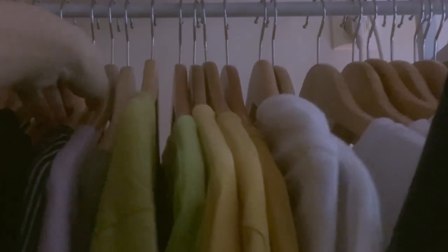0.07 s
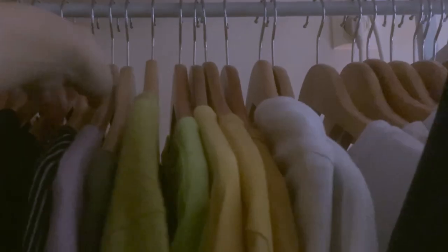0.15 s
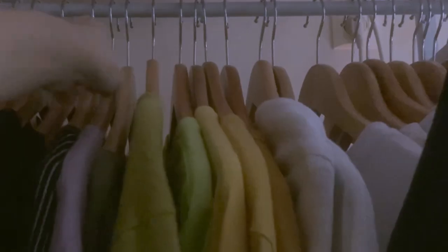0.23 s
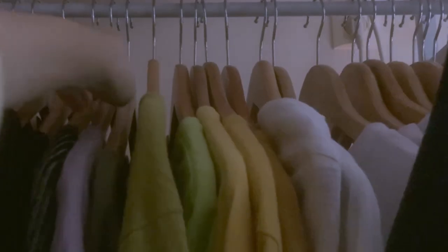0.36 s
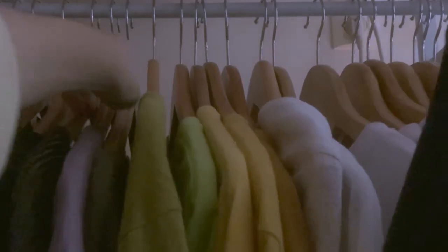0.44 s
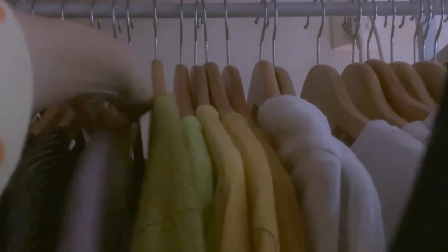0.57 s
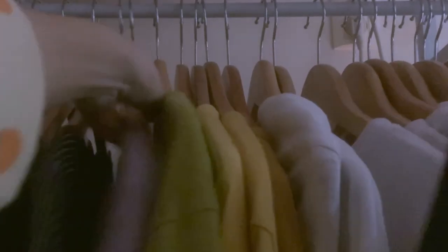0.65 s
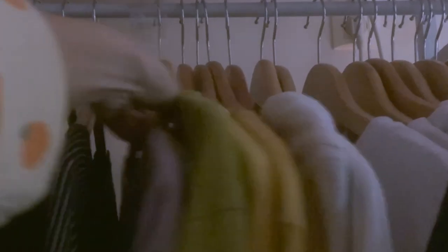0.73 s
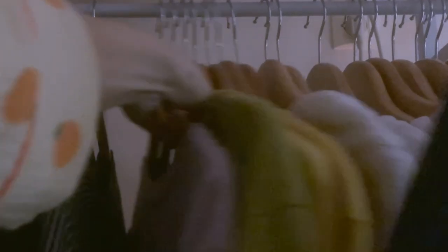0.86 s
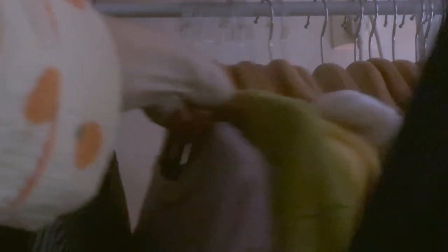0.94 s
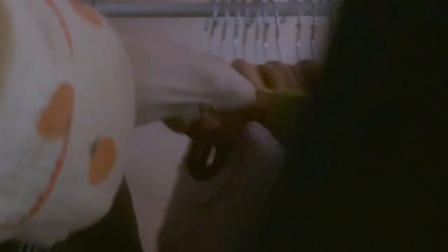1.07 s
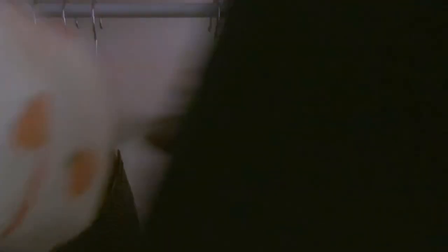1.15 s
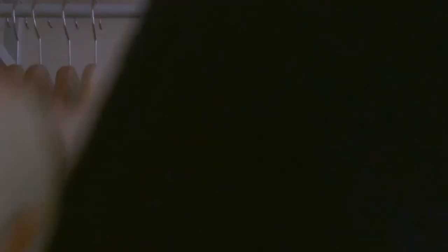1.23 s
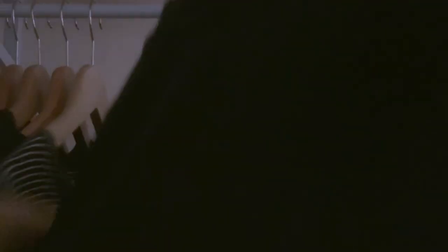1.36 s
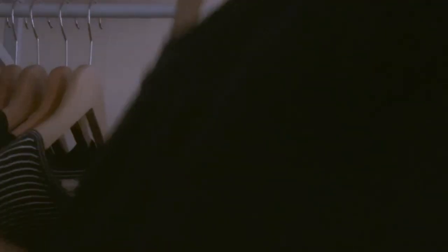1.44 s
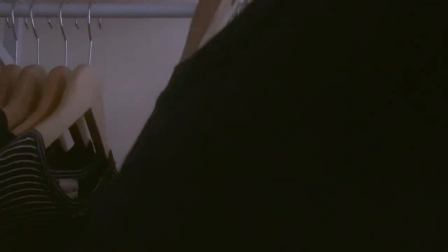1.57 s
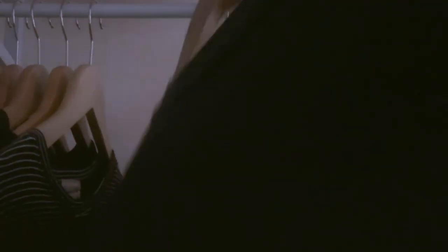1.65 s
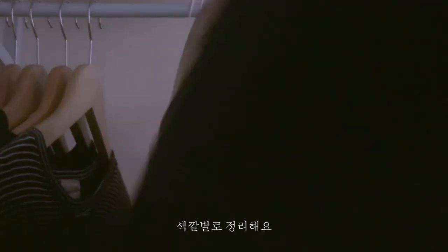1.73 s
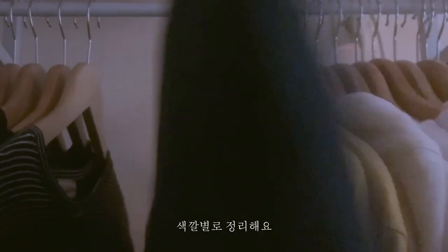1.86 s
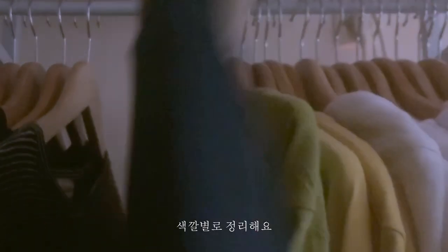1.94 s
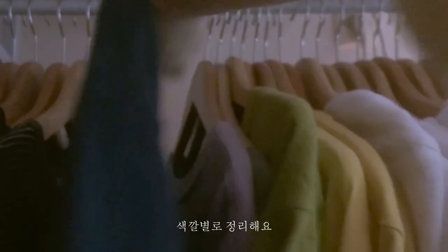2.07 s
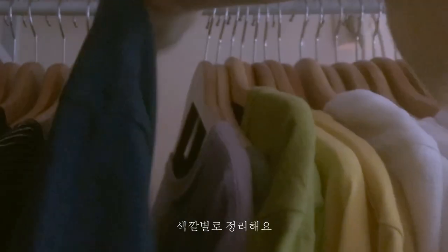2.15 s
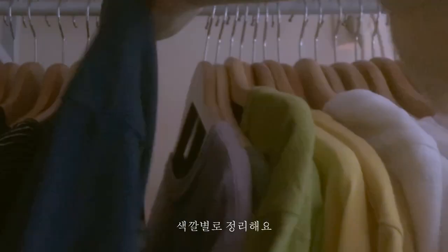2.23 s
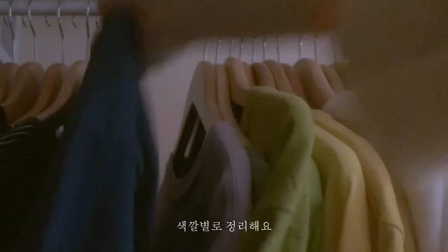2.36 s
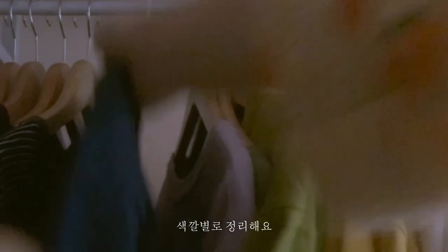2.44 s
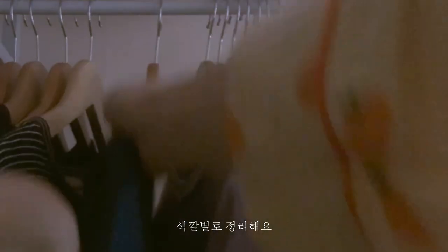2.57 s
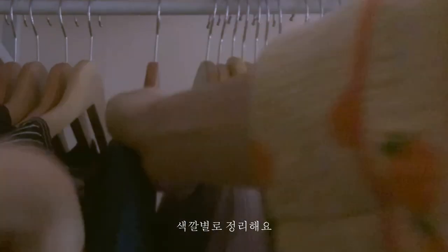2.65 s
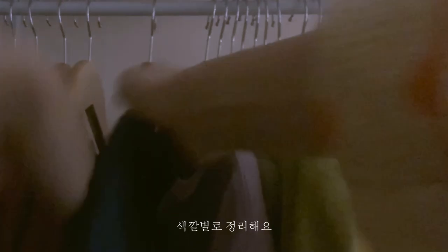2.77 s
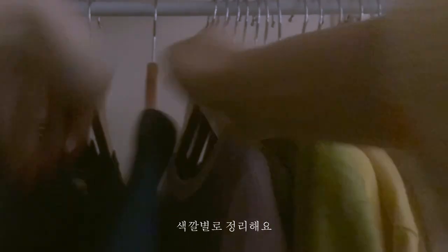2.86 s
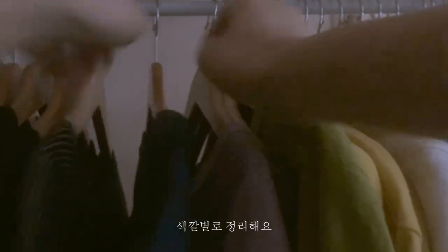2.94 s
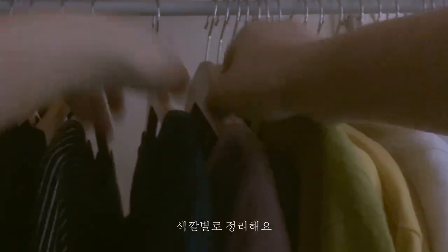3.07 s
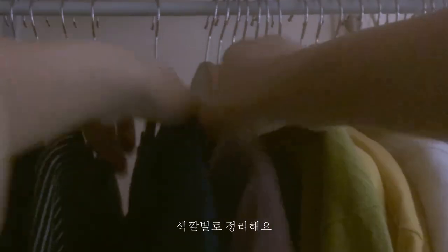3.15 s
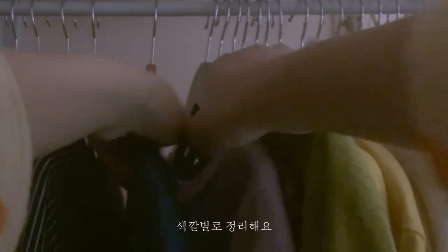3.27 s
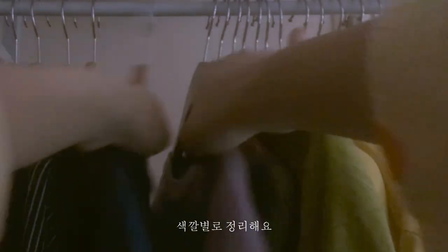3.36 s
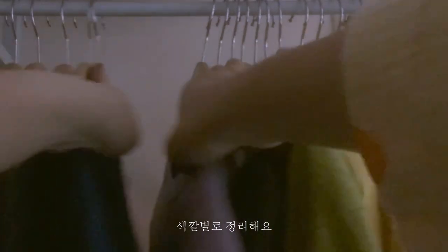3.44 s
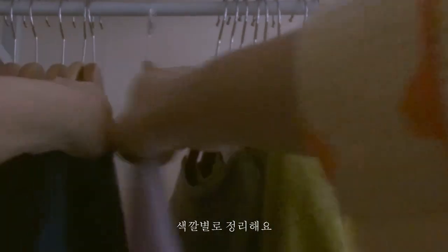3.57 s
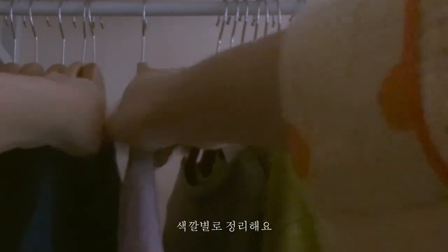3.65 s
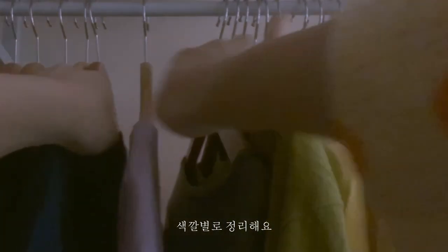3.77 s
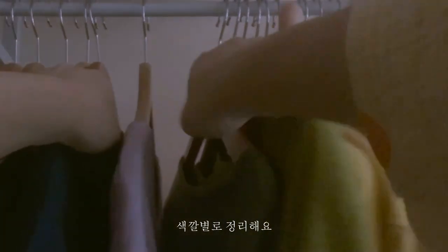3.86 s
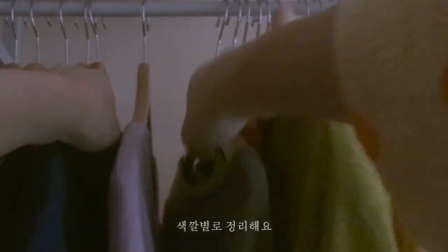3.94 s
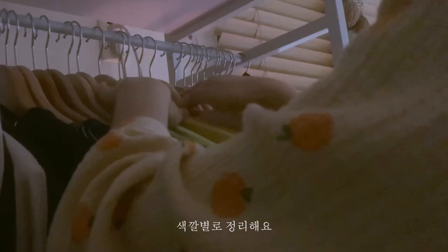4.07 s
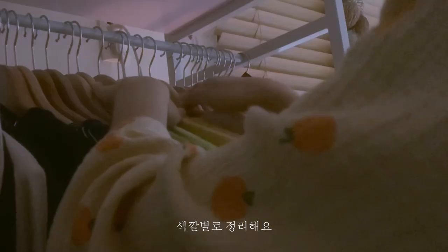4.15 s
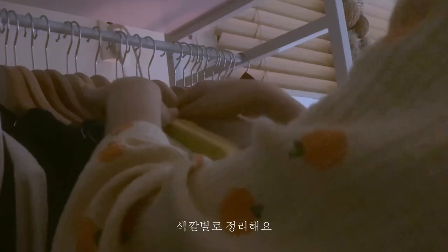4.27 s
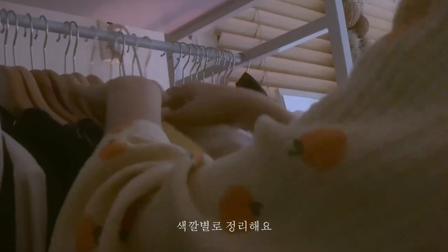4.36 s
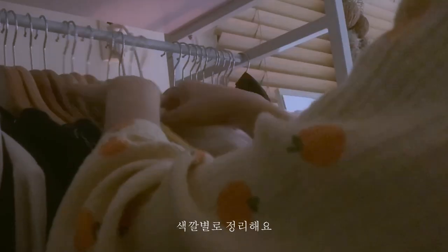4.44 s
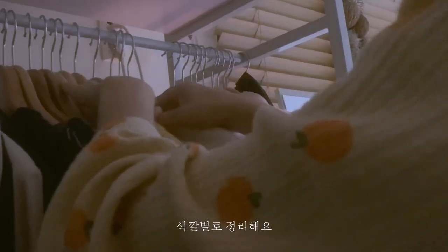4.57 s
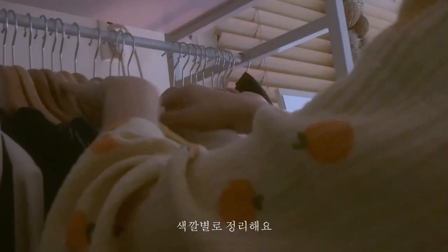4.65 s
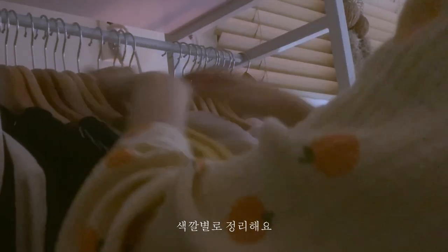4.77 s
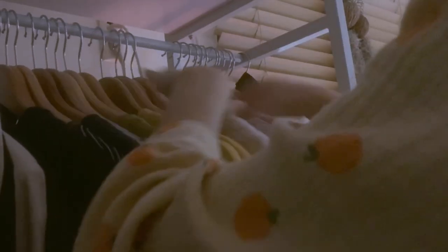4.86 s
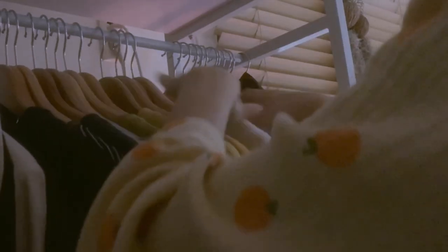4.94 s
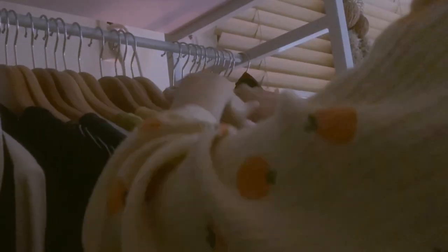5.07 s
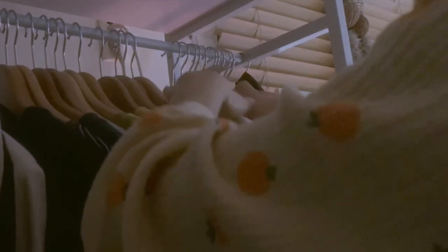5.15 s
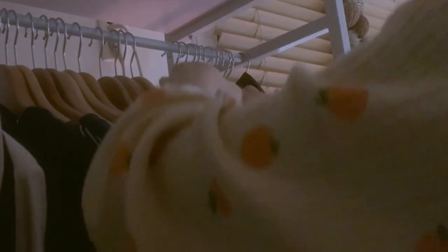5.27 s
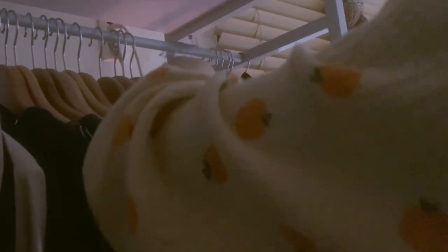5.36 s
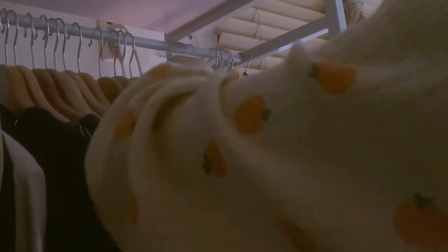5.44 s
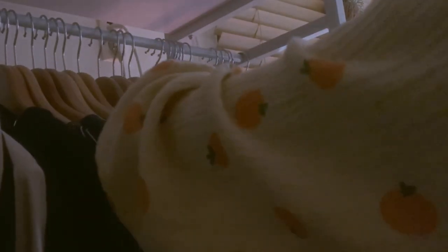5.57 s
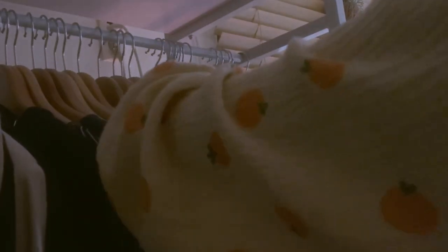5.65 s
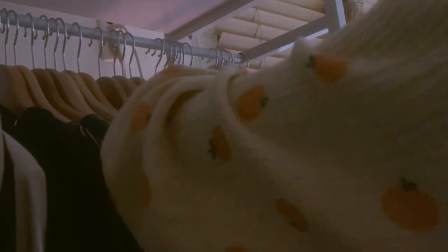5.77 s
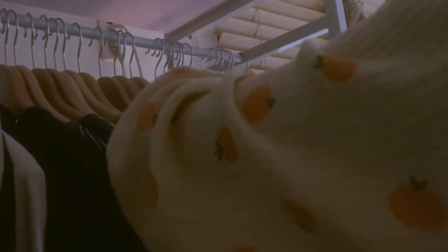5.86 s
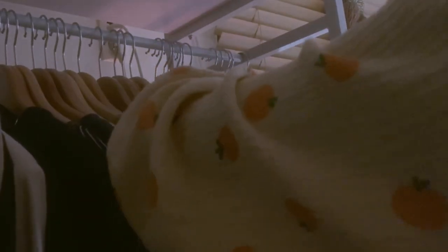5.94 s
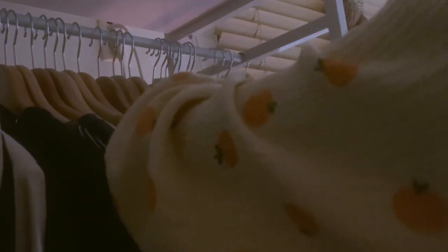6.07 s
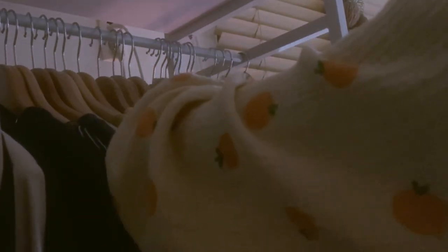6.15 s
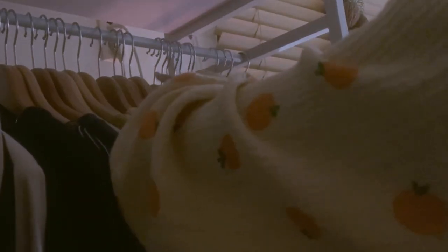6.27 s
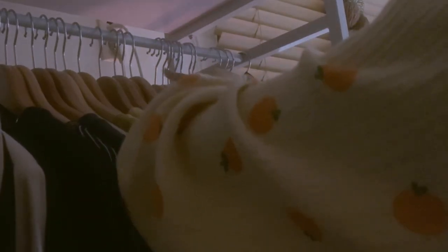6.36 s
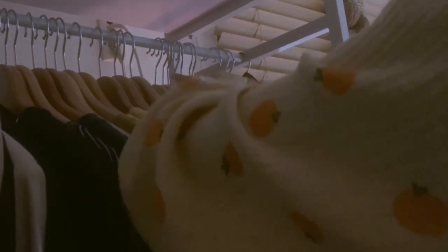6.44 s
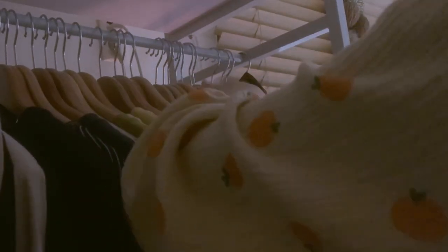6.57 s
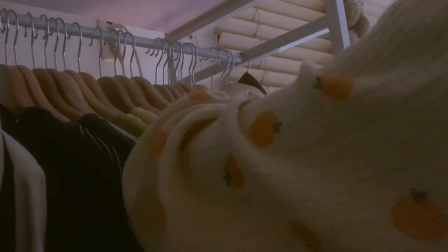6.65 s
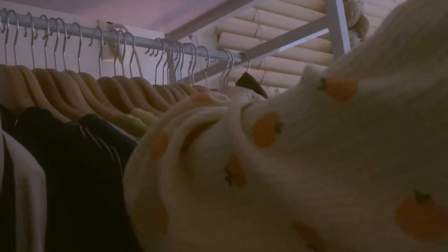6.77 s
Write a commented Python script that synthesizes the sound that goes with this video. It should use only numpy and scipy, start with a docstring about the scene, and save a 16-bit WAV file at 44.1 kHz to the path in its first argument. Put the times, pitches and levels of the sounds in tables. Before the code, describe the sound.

Metal hanger hooks clatter and squeak along a rail, wooden hangers clack hard, then sparse ticks, a clear squeak and a bright clink follow over low room rush.

```python
"""A small dressing room, in stereo: wooden coat hangers are pushed along a metal rail.
Steel hooks knock, scrape and clink: noise bursts and slips shake resonances of rail and hook.
Wooden shoulders clack and rub through resonances of wood; squeaks, a chirp and a groan are
sums of overtones. Sleeves rustle and bump as shaped noise, and a low rush of air lies behind it all."""
import sys
import numpy as np
from scipy import signal
from scipy.io import wavfile

SR = 44100
rng = np.random.default_rng(int(sys.argv[2]) if len(sys.argv) > 2 else 0)


def unload_wav(signal):
    """Save mono or channel-first audio to the path in sys.argv[1] as 16-bit WAV at rate SR, clipped to [-1, 1]."""
    wavfile.write(
        sys.argv[1],
        SR,
        np.round(np.clip(np.atleast_2d(signal).T, -1, 1) * 32767).astype(np.int16),
    )


N = 300321
TIME = np.arange(N) / SR
CUTOFF_HZ = 15800   # top of the microphone's range
ATTACK_S = .014   # the levels of a contact hold over this time

# Contact levels in the tables are set before the layer trims in scene() and the microphone.
# hooks jolting on the rail: start_s, clack_db, crack_db, chatter_s (time to die by 60 dB)
RAIL_JOLTS = [(0.6645, -41, -62, 0.013), (0.7609, -29, -50, 0.032), (.779, -39, -43, 0.015),
              (0.7928, -25.5, -31, 0.027), (0.9339, -31.5, -26, 0.019), (0.955, -31.5, -21, 0.019),
              (1.971, -68, -81.5, 0.0084), (2.5742, -32.5, -18, 0.025), (2.7977, -42.5, -40, 0.023),
              (2.813, -43.5, -41.5, 0.044), (2.909, -51, -77, .04), (3.605, -40, -56, 0.014),
              (3.842, -57, -70, 0.045), (4.241, -55.5, -53, .026), (4.445, -55.5, -77, 0.067),
              (4.513, -40.5, -50.5, 0.015), (4.555, -49.5, -62, 0.021), (4.9588, -46.5, -58.5, 0.074),
              (5.14, -53, -61, .06), (5.376, -42, -87, 0.034), (5.968, -50.5, -82, 0.036),
              (6.340, -44, -94, 0.017), (6.786, -44.5, -54, 0.016)]
# resonances of the rail: centre_hz, width_hz, level_db
RAIL_MODES = [(1082, 27, -7.5), (1353, 68, -2), (1723, 60, -7), (2165, 43, -5), (2395, 150, -14.5),
              (3230, 120, -3), (3930, 46, -6), (4490, 84, -1), (6600, 86, -32.5), (8500, 200, 5.5),
              (9755, 890, -0.5), (13500, 72, -11.5)]
# a harder jolt makes the rail ring much more, but the hanger thud only a little more
TYPICAL_CLACK_DB = -45
THUD_DB, THUD_FOLLOWS = -61, 0.25   # at a typical clack; dB per dB of clack
RING_DB, RING_FOLLOWS = -56, 1.575


def jolts(spread=0.047):
    """Hooks knock on the rail as the hangers are shoved; no two ring quite alike."""
    out = np.zeros(N)
    for start_s, clack_db, crack_db, chatter_s in RAIL_JOLTS:
        harder_db = clack_db - TYPICAL_CLACK_DB
        thud_db = THUD_DB + THUD_FOLLOWS * harder_db
        ring_db = RING_DB + RING_FOLLOWS * harder_db
        modes = [(hz * (1 + spread * rng.standard_normal()), width_hz, db)
                 for hz, width_hz, db in RAIL_MODES]
        force = soften(chatter(chatter_s), soft_hz=11800)
        jolt = body(force, modes, direct_db=-13)
        add(out, start_s, voiced(jolt, (thud_db, clack_db, ring_db, crack_db), ATTACK_S))
    return out


# hooks dragged along the rail: start_s, end_s, thud_db, clack_db, ring_db, crack_db
HOOK_SLIDES = [(.75, .80, -56.5, -45, -42.5, -40), (.795, .9, -53.5, -56.5, -50.5, -68.5),
               (.905, 0.999, -43.5, -38, -49, -37.5), (1.02, 1.07, -47.5, -46, -30, -22),
               (1.075, 1.14, -58, -44, -48, -27.5), (1.125, 1.171, -48, -41.5, -49.5, -67),
               (4.558, 4.667, -73, -56.5, -61, -71), (5.152, 5.26, -65.5, -66.5, -62.5, -72.5),
               (5.352, 5.42, -52, -46.5, -57, -70), (5.432, 5.485, -57, -39, -46, -38.5),
               (5.836, 5.96, -58.5, -57, -58.5, -89), (6.737, 6.79, -63.5, -58.5, -69.5, -61)]


def slides():
    """Dragged hooks catch and slip in quick runs that shake the rail."""
    return friction(HOOK_SLIDES, RAIL_MODES, direct_db=-9.0, soft_hz=12300,
                    slips_per_s=1200, uneven_db=2.5)


# squeaks of hooks, a chirp of rubbed wood at 3.4 s and a low wooden groan at 6.8 s;
# the row at 5.56 s is the room ringing on after the squeak:
# full_s (at full strength), pitch_hz, level_db, rise_s, hold_s, fall_s,
# pressure (0-1), waver (share of the pitch)
PITCHED_SOUNDS = [(0.767, 1379, -41, .012, 0.029, 0.029, .1, 0.019),
                  (.915, 1142, -44, 0.018, 0.045, .03, 0, 0.028),
                  (.958, 1400, -40, .02, 0.011, .03, .1, .025),
                  (1.032, 1231, -34, .025, 0.035, 0.027, 0.9, 0.01),
                  (1.1, 1238, -35, .05, 0.026, 0.041, 1, 0.0093),
                  (3.397, 3800, -53, 0.02, 0.018, .03, 0, 0.06),
                  (4.46, 1388, -56.5, .03, 0.047, .03, 0.48, 0.0092),
                  (5.19, 1495, -65.5, .06, 0.038, 0.063, 0.2, 0.0075),
                  (5.445, 1469, -24, .068, 0.0068, 0.058, .05, 0.002),
                  (5.518, 1477, -39.5, .04, 0.0023, 0.033, 0, 0.0049),
                  (5.56, 1488, -48, .03, .03, 0.083, 0.02, 0.009),
                  (6.366, 2046, -50, .025, .005, 0.059, 0, .02),
                  (6.426, 2015, -61, .03, 0.046, 0.066, 0, 0.013),
                  (6.797, 766, -52.5, .035, .013, .05, 0, 0.016)]


def pitched_sounds():
    """Hooks squeak where they grip, rubbed wood chirps and groans, and one squeak rings on in the room."""
    out = np.zeros(N)
    for full_s, hz, level_db, rise_s, hold_s, fall_s, pressure, waver in PITCHED_SOUNDS:
        sound = pitched_swell(hz, rise_s, hold_s, fall_s, pressure, waver)
        add(out, full_s - rise_s, from_db(level_db) * sound)
    return out


# overtones at full pressure: multiple (of the pitch), level_db
HARD_OVERTONES = [(1, 2.5), (2, -9.5), (3, -1.5), (4, -5), (5, -9.5), (6, -35), (7, -20), (8, -1), (9, -27),
                  (10, -22), (11, -30.5)]
# overtones at the lightest pressure: multiple (of the pitch), level_db
LIGHT_OVERTONES = [(1, 1), (2, -10.5), (3, -15), (4, -30), (5, -34.5), (6, -63), (7, -35.5)]
SWELL_RANGE_DB = 30   # swept during a rise or a fall
SWELL_ROUNDING = 1.22   # above 1 the top of a swell is rounded


def pitched_swell(hz, rise_s, hold_s, fall_s, pressure, waver,
                  flutter_db=(3.5, 4), rough=(.3, .7), brighten=(.3, .15)):
    """A wavering pitch swells, holds and fades; its overtones flutter and fray."""
    t = np.arange(SR // 2) / SR
    size = len(t)
    # shares weight the (light, hard) pairs of settings
    shares = [1 - np.clip(pressure, 0, 1), np.clip(pressure, 0, 1)]
    rising, falling = 1 - t / rise_s, (t - rise_s - hold_s) / fall_s
    slack = np.maximum(0, np.maximum(rising, falling))
    swell_db = -SWELL_RANGE_DB * slack ** SWELL_ROUNDING
    phase = 2 * np.pi * np.cumsum(hz * (1 + waver * drift(700, size=size))) / SR
    out = np.zeros(size)
    for k in range(1, min(len(HARD_OVERTONES), int(CUTOFF_HZ / hz)) + 1):
        light_hard_db = [np.interp(k, *np.transpose(table))
                         for table in (LIGHT_OVERTONES, HARD_OVERTONES)]
        partial_db = np.dot(shares, light_hard_db)
        # higher overtones follow the swell more strongly and flutter more
        brighten_db = np.dot(shares, brighten) * swell_db
        wander_db = np.dot(shares, flutter_db) * np.tanh(drift(140, size=size))
        grip_db = np.log(k) * (brighten_db + wander_db)
        fray = np.dot(shares, rough) * np.log(k) * drift(400, size=size)
        gain = from_db(swell_db + partial_db + grip_db)
        out += np.sqrt(2) * gain * np.sin(k * phase + fray)
    return out


# a hook dropped on the rail rings freely:
# start_s, thud_db, clack_db, ring_db, crack_db, chatter_s, ring_hz
HOOK_CLINKS = [(3.447, -71.5, -39.5, -40, -29.5, 0.025, 4884), (6.0763, -59, -38.5, -36, -29, 0.13, 4606)]
# resonances of a free hook: multiple (of its ring pitch), width_hz, level_db
HOOK_MODES = [(.36, 60, -14), (.81, 200, -12), (1, 110, 3), (1.08, 160, -5), (1.95, 900, -7),
              (2.9, 1200, -9)]


def clinks():
    """A hanger is hung back: its hook rings briefly at a pitch of its own."""
    out = np.zeros(N)
    for start_s, *levels_db, chatter_s, ring_hz in HOOK_CLINKS:
        modes = [(multiple * ring_hz, width_hz, db) for multiple, width_hz, db in HOOK_MODES]
        clink = body(chatter(chatter_s), modes, direct_db=-14)
        add(out, start_s, voiced(clink, levels_db, ATTACK_S))
    return out


# wooden shoulders meeting: start_s, thud_db, clack_db, ring_db, crack_db, chatter_s
SHOULDER_KNOCKS = [(2.5801, -26, -20.5, -36, -34.5, 0.05), (2.805, -41.5, -59.5, -37, -64.5, 0.094),
                   (3.392, -55, -58.5, -62, -67, 0.22)]
# resonances of a knocked wooden shoulder: centre_hz, width_hz, level_db
WOOD_MODES = [(330, 19, -8.5), (418.5, 160, -10.5), (450, 41, -1), (550, 23, 13), (680, 40, -15.5),
              (804, 20, -8), (986, 13, -19.5), (1083, 60, -8.5), (1310, 64, -14), (1570, 650, -14.5),
              (2010, 39, -25), (2756, 106, -3), (2750, 48, -3.5), (2650, 150, -9.5), (3320, 130, -4),
              (3620, 60, -22), (9400, 700, -9.5)]


def knocks(push=15, push_s=0.0003):
    """Shoulders clack: one soft push sounds the hollow wooden note, rebounds add the rattle."""
    out = np.zeros(N)
    for start_s, *levels_db, chatter_s in SHOULDER_KNOCKS:
        force = soften(chatter(chatter_s), soft_hz=9500)
        add(force, .001, push * np.hanning(int(push_s * SR)))
        knock = body(force, WOOD_MODES, direct_db=-24)
        add(out, start_s, voiced(knock, levels_db, ATTACK_S))
    return out


# one wooden shoulder rubbing past another: start_s, end_s, thud_db, clack_db, ring_db, crack_db
SHOULDER_RUBS = [(2.558, 2.585, -59, -51, -45.5, -80), (2.765, 2.85, -49.5, -58, -72, -75.5),
                 (3.386, 3.452, -57, -49, -48, -50.5), (3.522, 3.595, -57.5, -44.5, -51, -43.5),
                 (6.015, 6.082, -72, -46.5, -51, -47.5)]
# resonances of rubbed wood: centre_hz, width_hz, level_db
GRAIN_MODES = [(554, 9.3, 1.5), (1090, 41, -6.5), (3330, 300, -2), (3750, 140, -7), (6470, 110, -3.5),
               (9220, 680, -5)]


def rubs():
    """Rubbing shoulders catch and slip in denser runs that shake the wood."""
    return friction(SHOULDER_RUBS, GRAIN_MODES, direct_db=-18, soft_hz=12000,
                    slips_per_s=3000, uneven_db=2.5, ease_s=.018)


# garments brushing past: middle_s, half_s (half length), bump_db (soft bump), swish_db
GARMENT_BRUSHES = [(0.297, 0.41, -60.5, -103), (1.334, 0.13, -56, -63), (1.49, 0.089, -56, -62),
                   (1.567, 0.043, -48, -75), (1.758, 0.14, -64.5, -69.5), (2.18, 0.29, -57, -86.5),
                   (3.633, 0.042, -45, -76), (4.62, 0.062, -55.5, -70), (5.65, 0.11, -63.5, -86),
                   (6.756, .16, -76, -72)]
# colour of the soft bump: frequency_hz, density_db (per Hz, relative)
BUMP_COLOUR = [(25, -28), (55, 1), (150, 0.5), (300, -6.5), (700, -27), (2000, -53.5), (16000, -84)]
# colour of the swish: frequency_hz, density_db (per Hz, relative)
SWISH_COLOUR = [(25, -28), (1000, 0), (2500, -2.5), (6000, -2.5), (10000, -9), (14000, -9), (16000, -24.5)]
# the clothes sway whenever their hangers are knocked
SWAY_DB, SWAY_FOLLOWS, SWAY_S = -37.5, .45, .04   # at a full-scale knock; dB per dB; settling time
RUSTLE_DB = -87.5   # sleeves are never quite still


def cloth(contacts, knock_band_hz=(170, 1400)):
    """Garments bump softly when their hangers are knocked, and bump and swish as they brush past."""
    keep = np.exp(-1 / (SWAY_S * SR))
    knock_power = band(contacts, *knock_band_hz) ** 2
    knock = np.sqrt(signal.lfilter([1 - keep], [1, -keep], knock_power))
    bump = from_db(SWAY_DB) * knock ** SWAY_FOLLOWS
    swish = from_db(RUSTLE_DB)
    for middle_s, half_s, bump_db, swish_db in GARMENT_BRUSHES:
        touch = bell(middle_s, half_s)
        bump = np.hypot(bump, from_db(bump_db) * touch)
        swish = np.hypot(swish, from_db(swish_db) * touch)
    return bump * rush(BUMP_COLOUR, patchy_db=6) + swish * rush(SWISH_COLOUR, patchy_db=8.0)


# colour of the low rush: frequency_hz, density_db (per Hz, relative)
AIR_COLOUR = [(22, -37), (50, -3), (90, -9.5), (160, -7), (300, -13), (700, -21.5), (1000, -17.5),
              (1600, -24.5), (2300, -41.5), (4000, -41), (7000, -50.5), (9500, -37), (14000, -53.5),
              (16000, -57)]
# the background sound drops out for a moment, near the start and at 4.14 s:
# middle_s, half_s (half length), depth_db
DROPOUTS = [(0.042, 0.021, 26), (4.144, 0.011, 27)]
AIR_DB, AIR_FADE_DB_PER_S = -60, 0.15


def air():
    """A low rush of noise whose level sinks very slightly; twice the sound drops out for a moment."""
    dropout_db = sum(depth_db * bell(middle_s, half_s) for middle_s, half_s, depth_db in DROPOUTS)
    level_db = AIR_DB - AIR_FADE_DB_PER_S * TIME - dropout_db
    return from_db(level_db) * rush(AIR_COLOUR, patchy_db=3.5)


# reverberation time of the room: frequency_hz, t60_s
ROOM_DECAY = [(100, .42), (500, .4), (1500, .5), (3200, .55), (6000, .42), (10000, .35), (16000, .3)]
# colour of the reflections: frequency_hz, level_db
ROOM_COLOUR = [(100, 22), (500, 4), (1500, 2), (3200, 1), (5000, -0.5), (9500, -7.5), (16000, -4)]


def room(x, pan_db, lag_ms, near_db, tail_db, near_t60_s=0.12):
    """Direct sound reaching the left side first, quick reflections off wall and shelves, and the tail."""
    t = np.arange(int(.7 * SR)) / SR
    response = 0
    for hz, noise in stereo_bands(len(t)):
        near = from_db(near_db - 60 * t / near_t60_s) / np.sqrt(near_t60_s)
        tail = from_db(tail_db - 60 * t / at_hz(ROOM_DECAY, hz))
        response = response + noise * from_db(at_hz(ROOM_COLOUR, hz)) * (near + tail)
    fade_in = np.clip(t / 0.0022, 0, 1)
    response = response * fade_in * np.sqrt(np.log(1000) / SR)
    right = np.interp(TIME - lag_ms / 1000, TIME, x)
    direct = np.array([x, right]) * from_db([[pan_db / 2], [-pan_db / 2]])
    return direct + signal.fftconvolve(x[None], response, axes=1)[:, :N]


def chatter(length_s):
    """Force of one contact: an uneven burst of tiny rebounds, down 60 dB after length_s."""
    t = np.arange(SR // 3) / SR
    uneven = from_db(3 * drift(900, size=len(t)))
    bite = np.clip(t / .002, 0, 1)
    return rng.standard_normal(len(t)) * uneven * bite * from_db(-60 * t / length_s)


def friction(strokes, modes, direct_db, soft_hz, slips_per_s, uneven_db, ease_s=.014):
    """Sliding surfaces catch and slip in quick, uneven runs, shaking a body."""
    out, t = np.zeros(N), np.arange(SR // 3) / SR
    for start_s, end_s, *levels_db in strokes:
        length_s = max(end_s - start_s, .02)
        ease = np.clip(np.minimum(t, length_s - t) / ease_s, 0, 1)
        pressure = ease * from_db(uneven_db * drift(200, size=len(t)))
        slips = (rng.random(len(t)) < slips_per_s / SR) * rng.standard_normal(len(t))
        stroke = body(soften(slips * pressure, soft_hz), modes, direct_db)
        add(out, start_s, voiced(stroke, levels_db, length_s))
    return out


def soften(force, soft_hz):
    """A contact of finite hardness carries little above its corner."""
    return signal.sosfilt(signal.butter(4, min(soft_hz, .45 * SR), fs=SR, output="sos"), force)


def body(force, modes, direct_db):
    """A force heard through parallel resonances, plus the bare contact noise."""
    out = from_db(direct_db) * force
    for k, (hz, width_hz, db) in enumerate(modes):
        r = np.exp(-np.pi * width_hz / SR)
        poles = [1, -2 * r * np.cos(2 * np.pi * hz / SR), r * r]
        ringing = (1 - r * r) / 2 * signal.lfilter([1, 0, -1], poles, force + 1e-18)
        out = out + (-1) ** k * from_db(db) * ringing
    return out


# edges of the four registers of every contact (thud, clack, ring, crack): edge_hz
REGISTER_EDGES_HZ = [170, 850, 3400, 6800, 16000]


def voiced(sound, levels_db, length_s):
    """Give each register its rms level over the first length_s of a sound."""
    out = 0
    edges = zip(REGISTER_EDGES_HZ, REGISTER_EDGES_HZ[1:])
    for k, (db, (low, high)) in enumerate(zip(levels_db, edges)):
        part = (-1) ** k * band(sound, low, high)   # alternate signs join registers smoothly
        out = out + from_db(db) * part / np.sqrt(np.mean(part[:int(length_s * SR)] ** 2))
    return out


def rush(spectrum, patchy_db):
    """Stereo noise of a given colour whose bands flutter; rms 1."""
    total = 0
    for hz, noise in stereo_bands(N):
        total = total + noise * from_db(at_hz(spectrum, hz) + patchy_db * drift(22))
    return rms_one(total)


# likeness of the two sides: frequency_hz, correlation (left-right)
SIDE_LIKENESS = [(30, .92), (120, .8), (300, .66), (700, .42), (1500, .12), (3000, 0)]


def stereo_bands(size):
    """Half-octave bands of stereo noise, alike in the bass and unrelated in the treble: (Hz, noise)."""
    edges = np.geomspace(22, 17000, 20)
    white = rng.standard_normal((2, 2, size))   # neighbouring bands use different noise
    for k, (low, high) in enumerate(zip(edges, edges[1:])):
        hz = np.sqrt(low * high)
        mid, side = band(white[k % 2], low, high)
        alike = np.clip(at_hz(SIDE_LIKENESS, hz), -1, 1)
        yield hz, np.sqrt(1 + alike) * mid + np.sqrt(1 - alike) * np.array([side, -side])


def bell(s, half_s):
    """A smooth bell of height 1 around time s."""
    return np.exp(-np.minimum(((TIME - s) / half_s) ** 2, 50))


def drift(rate, size=N):
    """Smooth random wander through rate knots per second, each drawn with spread 1."""
    knots = rng.standard_normal(size // 16 + 2)
    return np.interp(np.arange(size) * rate / SR, np.arange(len(knots)), knots)


def band(x, low, high):
    """Causal band-pass."""
    return signal.sosfilt(signal.butter(2, [low, high], "band", fs=SR, output="sos"), x + 1e-18)


def at_hz(points, hz):
    """Read a table on a log-frequency axis."""
    f, value = np.transpose(points)
    return np.interp(np.log(hz), np.log(f), value)


def add(track, s, sound):
    """Mix a sound into a track at time s."""
    i = int(s * SR)
    track[i:i + len(sound)] += sound[:N - i]


def from_db(db):
    """Decibels to gain."""
    return 10 ** (np.asarray(db) / 20)


def rms_one(x):
    """Scale to unit power."""
    return x / np.sqrt(np.mean(x ** 2) + 1e-20)


def scene():
    """Hangers in the room, with cloth and air around them."""
    lag_ms, wood_lag_ms = .105, .21   # the right side hears the direct sound this much later
    hooks = room(from_db(-3.5) * jolts(), pan_db=0, lag_ms=lag_ms, near_db=-3, tail_db=-1)
    sliding = room(from_db(-13) * slides(), pan_db=1.0, lag_ms=lag_ms, near_db=-2.5, tail_db=-1)
    pitched = room(pitched_sounds(), pan_db=-2.5, lag_ms=lag_ms, near_db=-14, tail_db=-12)
    hung = room(from_db(-2.5) * clinks(), pan_db=-2, lag_ms=.02, near_db=-5, tail_db=-.5)
    wood = room(from_db(-4.0) * knocks(), pan_db=3.5, lag_ms=wood_lag_ms, near_db=-2.5, tail_db=-7.5)
    rubbing = room(from_db(-6) * rubs(), pan_db=-1.0, lag_ms=lag_ms, near_db=-2, tail_db=-7.5)
    contacts = hooks + sliding + hung + wood + rubbing
    return contacts + pitched + cloth(contacts.mean(axis=0)) + air()


def record(dry, presence_db=2, low_cut_hz=33):
    """The microphone has a dip and then a lift in the top octave; deep bass and the very top are cut."""
    dipped = signal.lfilter(*signal.iirnotch(11750, 6, fs=SR), dry)
    top = band(dipped, 12600, 15000)
    bass_cut = signal.butter(2, low_cut_hz, "high", fs=SR, output="sos")
    coloured = signal.sosfilt(bass_cut, dipped + from_db(presence_db) * top)
    top_cut = signal.ellip(10, .3, 80, CUTOFF_HZ, fs=SR, output="sos")
    return signal.sosfilt(top_cut, coloured)


dry = scene()
out = record(dry)
unload_wav(out)
```